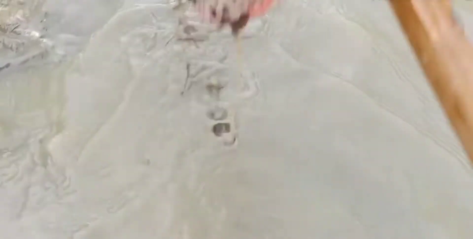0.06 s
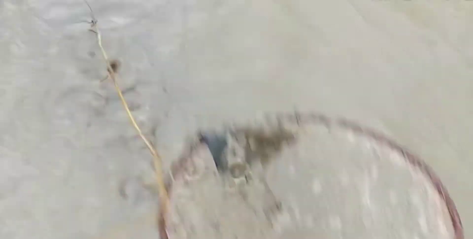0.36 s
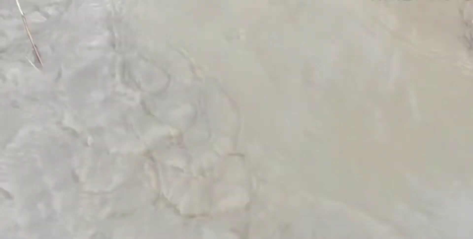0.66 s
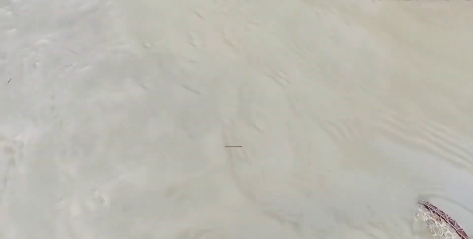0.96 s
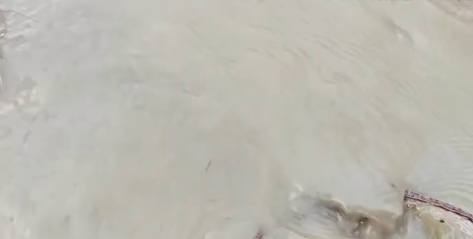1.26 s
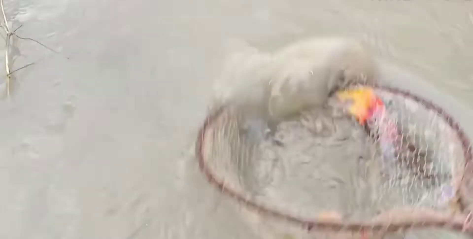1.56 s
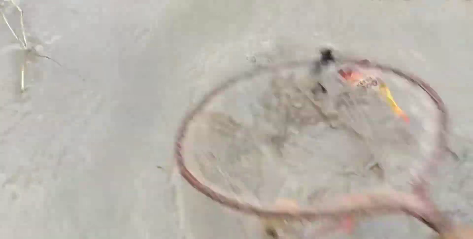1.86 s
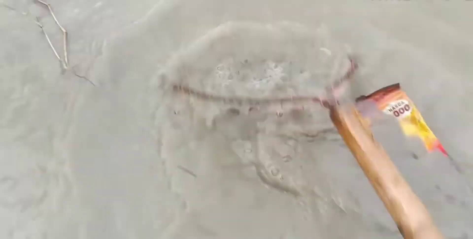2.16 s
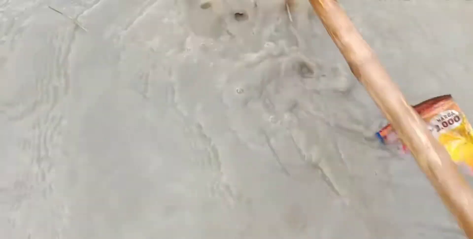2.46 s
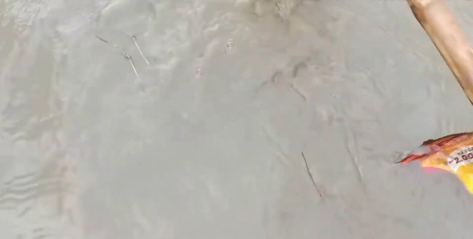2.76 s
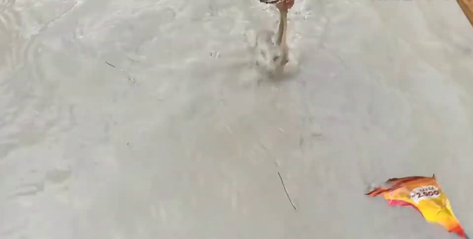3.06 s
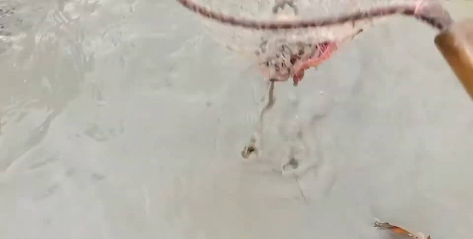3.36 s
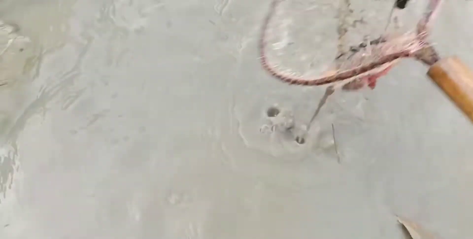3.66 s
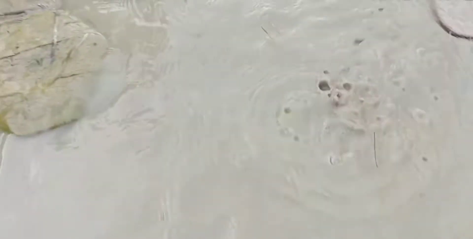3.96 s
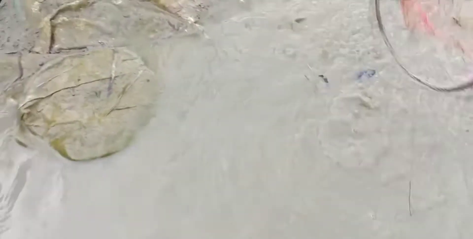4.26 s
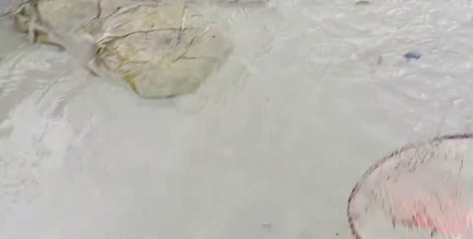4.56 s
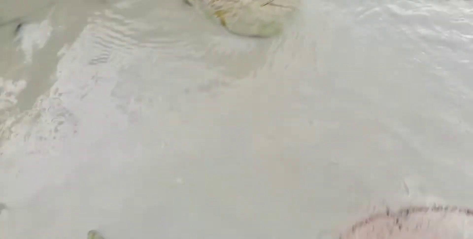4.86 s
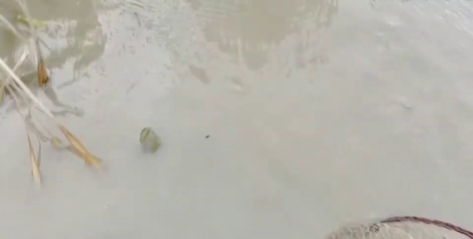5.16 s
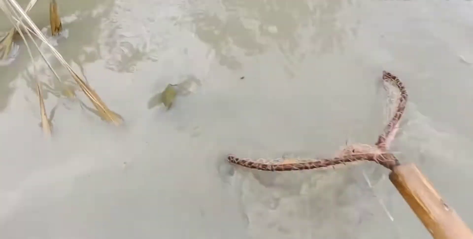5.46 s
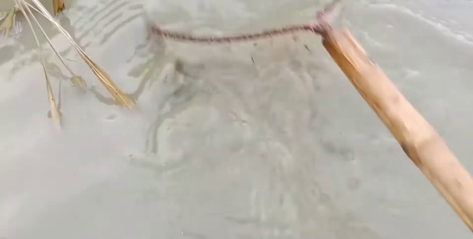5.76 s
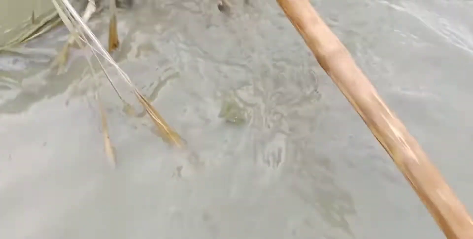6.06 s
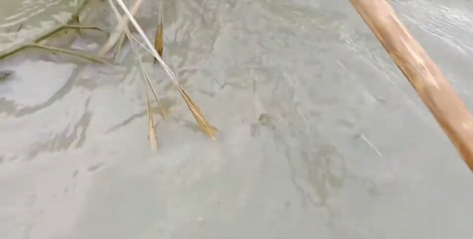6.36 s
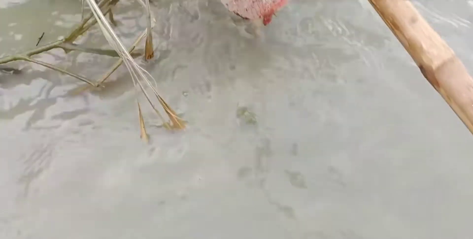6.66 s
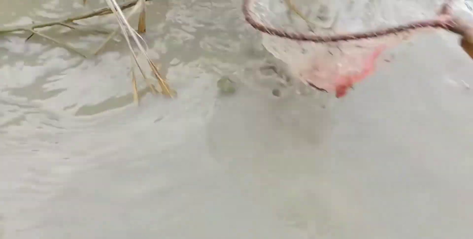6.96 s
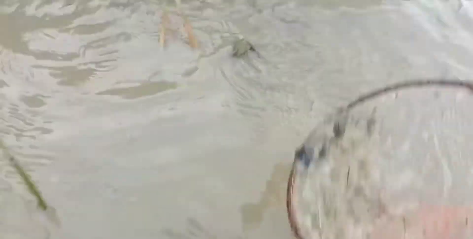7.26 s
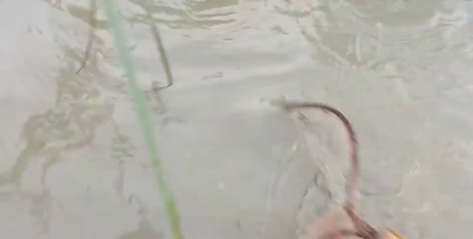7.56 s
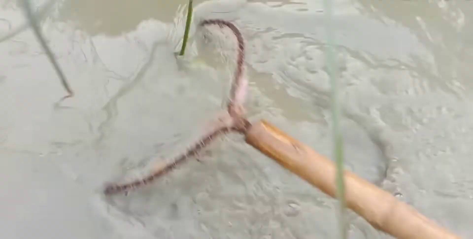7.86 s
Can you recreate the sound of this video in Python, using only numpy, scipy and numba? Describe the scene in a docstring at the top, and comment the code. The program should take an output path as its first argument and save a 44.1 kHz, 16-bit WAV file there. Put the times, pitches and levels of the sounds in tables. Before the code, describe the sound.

Close plops, gulps and fizzing splashes as a net scoops through a shallow stream, water trickling from the mesh after each stroke.

```python
"""A low outdoor rumble and a faint trickle, then close plops: a hand net on a bamboo pole is dipped,
swept and lifted through a shallow muddy stream. Trapped air rings as plops, gulps and slaps, falling
drops tick on the surface, and the mesh tears the water into fizzing splashes and trickles after each
stroke. Faint whistles, two knocks of the pole and a far hum sit behind the water.
The two microphone ports colour the treble differently."""
import sys
import numpy as np
from scipy import signal
from scipy.fft import rfft, irfft, next_fast_len
from scipy.io import wavfile
from scipy.ndimage import uniform_filter1d
from numba import njit

SR = 44100
rng = np.random.default_rng(int(sys.argv[2]) if len(sys.argv) > 2 else 0)


def dump_mix(stems):
    """Bounce the given channels to the path in sys.argv[1] as a 16-bit WAV at rate SR."""
    frames = np.atleast_2d(stems).T  # one column per channel
    limited = np.clip(frames, -1, 1)  # hard clip at full scale
    pcm = np.round(limited * 32767).astype(np.int16)
    wavfile.write(sys.argv[1], SR, pcm)


N = 348831
TIME = np.arange(N) / SR


def undb(db):
    """Decibels to gain."""
    return 10 ** (np.asarray(db) / 20)


def unit(x):
    """Scale to an rms of 1."""
    return x / np.sqrt(np.mean(x ** 2))


def band(x, low_hz, high_hz, order=2):
    """Causal band-pass."""
    edges_hz = [low_hz, min(high_hz, .45 * SR)]
    return signal.sosfilt(signal.butter(order, edges_hz, "band", fs=SR, output="sos"), x)


def colour(x, points):
    """Minimum-phase EQ through (pitch_hz, gain_db) points, so that attacks stay sharp."""
    size = 2 * next_fast_len(N // 2 + 4096)
    hz, db = np.transpose(points)
    bins_hz = np.arange(size // 2 + 1) * SR / size
    gain = undb(np.interp(np.log(bins_hz + 1), np.log(hz), db))
    cepstrum = irfft(np.log(gain))
    cepstrum[1:size // 2] *= 2
    cepstrum[size // 2 + 1:] = 0
    return irfft(rfft(x, size) * np.exp(rfft(cepstrum)))[..., :N]


def wander(rate_hz):
    """Smooth random modulation with an rms near 1."""
    hold = int(SR / rate_hz)
    steps = np.repeat(rng.standard_normal(N // hold + 1), hold)
    return unit(uniform_filter1d(steps, hold)[:N])


def add(out, start_s, x):
    """Mix a short sound into both ports."""
    start = max(int(start_s * SR), 0)
    out[:, start:start + x.shape[-1]] += x[..., :max(N - start, 0)]


def ring(hz, t60_s, rise=0, build_cycles=0.6):
    """A damped tone that builds over its first cycles and glides by the share `rise` as it dies."""
    t = TIME[:int(1.2 * t60_s * SR)]
    turns = hz * (t + rise * t ** 2 / (2 * t60_s))
    decay = np.exp(-np.log(1000) * t / t60_s)
    return np.sin(2 * np.pi * turns) * decay * (1 - np.exp(-turns / build_cycles))


def noise_tail(length, t60_s, low_hz, high_hz):
    """A dense decay of reflections, different at each port."""
    tail = rng.standard_normal((2, length)) * np.exp(-np.log(1000) * TIME[:length] / t60_s)
    return band(tail / np.linalg.norm(tail, axis=1, keepdims=True), low_hz, high_hz)


def reflected(x, t60_s, low_hz, wet_db):
    """Add close reflections, new for each spot on the water, keeping the sound's energy."""
    paths = undb(wet_db) * noise_tail(SR // 25, t60_s, low_hz, SR / 2)
    paths[:, 0] += 1  # the direct path
    heard = signal.fftconvolve(np.atleast_2d(x), paths, axes=1)
    dry_size = np.linalg.norm(x, axis=-1, keepdims=True)
    return heard * dry_size / np.linalg.norm(heard, axis=1, keepdims=True)


def outdoors(gain_db=3, side_db=-10, wide_db=-3, wide_hz=900):
    """Open air: a low rumble near the centre, under a faint wide hiss."""
    # tone of the air: pitch_hz, gain_db
    air = [(20, -11), (38, 1.5), (53, -5), (72, -3), (92, -8), (140, -8.5), (220, -15.5), (330, -22.5),
           (600, -27.5), (1500, -39), (4000, -54.5), (15000, -51.5)]
    # fader ride of the air: time_s, level_db
    rumble = [(0.0, -42), (1.12, -43.5), (4.07, -43), (5.08, -48.5), (6.2, -46.5), (6.4, -42), (7.9, -45.5)]
    mid, side = colour(rng.standard_normal((2, N)), air)
    side = undb(side_db) * side + undb(wide_db) * band(side, wide_hz, 15000)
    ride_db = np.interp(TIME, *np.transpose(rumble))
    return np.array([mid + side, mid - side]) / np.std(mid) * undb(ride_db + gain_db)


def hum(pitch_hz=71.1, drift=0.02494, waver_db=3):
    """A faint, far hum wanders in pitch and wavers in level, dead centre."""
    # partials of the hum: harmonic, level_db
    partials = [(1, -48.5), (2, -60)]
    phase = 2 * np.pi * np.cumsum(pitch_hz * (1 + drift * wander(3))) / SR
    return sum(undb(db) * unit(undb(waver_db * wander(5.5)) * np.sin(harmonic * phase))
               for harmonic, db in partials)


@njit
def tiny_bubbles(starts, hz, cycles, gains):
    """Each tiny bubble rings for its number of cycles, rising a little in pitch."""
    out = np.zeros(N)
    for k in range(len(starts)):
        length = int(cycles[k] * SR / hz[k])
        for i in range(min(length, N - starts[k])):
            age = i / length
            phase = 2 * np.pi * cycles[k] * age * (1 + .04 * age)
            out[starts[k] + i] += gains[k] * np.exp(-6 * age) * np.sin(phase)
    return out


def froth(per_s, low_hz, high_hz, cycles, scatter_db, lag_s=.00025):
    """A cloud of small bubbles, a few much louder than the rest; each reaches one port a little sooner."""
    # tone of the spray: pitch_hz, gain_db
    spray = [(400, 10), (1300, 5.5), (2200, 0.5), (3000, -5.5), (3900, -7.5), (6500, -9.5), (10000, -9.5),
             (15000, -6.5)]
    when, pitch, life, luck, place = rng.random((int(per_s * N / SR), 5)).T
    hz = (np.sqrt(low_hz) + pitch * (np.sqrt(high_hz) - np.sqrt(low_hz))) ** 2
    turns = cycles * (.5 + life) * np.sqrt(hz / low_hz)  # smaller bubbles ring for more cycles
    gains = np.sqrt(hz) * undb(-scatter_db * np.log(.01 + luck))
    lag = (place - .5) * lag_s * SR
    arrivals = [np.abs(when * N + side * lag).astype(np.int64) for side in (-1, 1)]
    cloud = np.array([tiny_bubbles(starts, hz, turns, gains) for starts in arrivals])
    return unit(colour(cloud, spray))


def mesh_flow(rise_s=0.1, drain_s=0.11, stream_db=-70.5):
    """The flow builds into each stroke, holds, then drains away to the stream's own trickle."""
    # strokes that set water running through the mesh: start_s, length_s, level_db
    strokes = [(0.178, 0.13, -56.5), (0.63, 0.23, -54), (1.698, 0.25, -54), (2.243, 0.053, -53),
               (2.76, 0.51, -53.5), (3.5, 0.96, -56), (3.976, 0.22, -55), (4.24, 0.17, -60),
               (5.442, 0.088, -59), (6.18, 0.4, -52.5), (6.69, 0.57, -58.5), (7.59, .3, -48)]
    flow = undb(stream_db)
    for start_s, length_s, db in strokes:
        outside = np.maximum((start_s - TIME) / rise_s, (TIME - start_s - length_s) / drain_s)
        flow = np.maximum(flow, undb(db) * np.exp(-np.maximum(outside, 0)))
    return flow


def trickle(spurt_db=3):
    """Water drains through the mesh in spurts: soft fizz, small gurgles, pitched drips, fine droplets."""
    flow = mesh_flow() * undb(spurt_db * wander(24))
    fizz = undb(-2) * froth(per_s=9000, low_hz=2200, high_hz=16000, cycles=18, scatter_db=2.8)
    gurgle = undb(-5) * froth(per_s=1800, low_hz=800, high_hz=3400, cycles=14, scatter_db=2)
    drips = undb(-7) * froth(per_s=45, low_hz=1350, high_hz=3200, cycles=32, scatter_db=2.2)
    droplets = undb(-6) * froth(per_s=90, low_hz=5200, high_hz=13000, cycles=24, scatter_db=3.2)
    return flow * (fizz + gurgle + drips + droplets)


def large_bubbles(wobble_db=2, gain_db=0.6, low_hz=450):
    """Trapped air rings for a set number of cycles, so low notes last longer."""
    # bubbles that stay under and nearly hold their pitch: start_s, pitch_hz, level_db
    plops = [(.178, 3340, -35.5), (.396, 1400, -22), (.567, 900, -27.5), (.568, 1562, -15.5),
             (.696, 1234, -16), (.7327, 1480, -26.5), (.822, 730, -32), (1.8215, 1830, -26.5),
             (2.226, 3070, -27), (2.812, 1814, -29), (2.921, 1510, -34.5), (3.058, 1810, -37.5),
             (3.314, 3080, -41), (3.5525, 1167, -21), (3.554, 677, -25.5), (3.7332, 598, -15),
             (3.752, 1450, -32), (3.765, 578, -17.5), (3.82, 2050, -34), (3.9608, 1386, -27.5),
             (4.201, 874, -14), (5.266, 970, -41.5), (5.449, 1480, -31.5), (6.259, 2350, -29.5),
             (6.7634, 756, -8), (6.855, 2310, -34), (7.1598, 1720, -17.5), (7.275, 2510, -32.5),
             (7.548, 1112, -27.5), (7.675, 507, -20.5), (7.716, 580, -14.5), (7.782, 519, -13.5),
             (7.843, 490, -21.5)]
    # bubbles that climb to the surface and swoop upward: start_s, pitch_hz, level_db
    gulps = [(.2812, 1120, -12.5), (1.677, 683, -25), (2.029, 1250, -25), (2.051, 1068, -14.5),
             (3.812, 627, -23), (4.097, 1110, -29.5), (4.184, 1060, -20), (6.124, 623, -28),
             (6.162, 875, -30.5), (6.826, 1082, -25), (7.641, 642, -20.5), (7.665, 1554, -26),
             (7.684, 750, -13), (7.697, 1006, -11.5), (7.842, 693, -18.5)]
    # open pockets of air that close at once: start_s, pitch_hz, level_db
    slaps = [(.2645, 1350, -21), (.5955, 2120, -17), (1.679, 1020, -16), (1.7885, 1930, -7),
             (1.8975, 1510, -17.5), (2.0535, 1960, -3), (2.0592, 590, -8), (3.4437, 4520, -4.5),
             (3.4692, 1066, -6.5), (3.487, 1830, -14.5), (3.5523, 1640, -7.5), (4.217, 1150, -9.5),
             (6.7634, 1450, -12.5), (7.156, 2470, -16), (7.579, 2020, -13), (7.81, 1430, -12.5),
             (7.842, 2000, -33)]
    out = np.zeros((2, N))
    for rows, cycles, rise, pinch_s in ((plops, 64, .061, .0013),
                                        (gulps, 54, .614, .0008),
                                        (slaps, 16.7, -.16, .00065)):
        for start_s, hz, db in rows:
            bubble = ring(hz, cycles / hz, rise, build_cycles=hz * pinch_s)
            add(out, start_s, undb(db) * reflected(bubble, t60_s=.056, low_hz=760, wet_db=-2))
    wobble = undb(gain_db + wobble_db * wander(230))  # loudness wobbles as the bubbles' shape does
    return band(out * wobble, low_hz, 18000, order=4)  # little lies below the largest bubble's pitch


def drop_ticks(touch_s=.001, crack_s=.0007, spatter_s=.03, spatter_db=-20, gain_db=-8, beads=3):
    """Each drop cracks the surface, throws fine spatter and leaves a few tiny ringing beads of air."""
    # drops striking the surface: hit_s, level_db
    drops = [(.266, -29), (.345, -30.5), (.568, -28.5), (.673, -27.5), (0.696, -23), (.733, -19),
             (0.851, -17.5), (1.713, -25.5), (1.794, -15), (2.0589, -7), (2.258, -27), (2.282, -35),
             (2.794, -20.5), (2.922, -23.5), (3.022, -27), (3.263, -23.5), (3.339, -24.5), (3.4447, -14.5),
             (3.555, -19), (3.898, -19), (3.962, -26.5), (4.216, -13), (5.576, -25.5), (6.079, -24.5),
             (6.764, -8.5), (6.78, -21), (6.819, -20.5), (7.156, -22.5), (7.579, -12.5), (7.842, -15.5)]
    out = np.zeros((2, N))
    age = TIME[:SR // 20] - 10 * touch_s
    crack = np.exp(np.minimum(age / touch_s, -age / crack_s))
    spatter = np.exp(np.minimum(age / touch_s, -age / spatter_s))
    envelope = crack + undb(spatter_db) * spatter
    for hit_s, db in drops:
        gain = undb(db + gain_db)
        burst = envelope * rng.standard_normal((2, len(age)))
        add(out, hit_s + age[0], gain * burst * np.std(envelope) / np.std(burst))
        for hz in 4000 + 8000 * (np.arange(beads) + rng.random(beads)) / beads:
            bead = reflected(ring(hz, t60_s=.007, build_cycles=2), t60_s=.018, low_hz=2000, wet_db=-2)
            add(out, hit_s, gain * rng.uniform(.44, 1) * bead)
    return band(out, 4000, 14000)


def splashes(gain_db=-1, surge_db=2.5, splash_top_hz=14000):
    """The net tears the water: dense froth swells and collapses, deeper when more air is dragged under."""
    # sheets of water breaking: crest_s, level_db, swell_s, fade_s, low_hz
    sheets = [(0.794, -38, 0.0043, 0.036, 1820), (.848, -34.5, 0.042, .009, 550),
              (1.1, -49.5, 0.031, .028, 2180), (1.701, -42, 0.033, 0.044, 646),
              (1.791, -20, .0092, 0.0044, 1720), (1.993, -30.5, .022, 0.028, 1460),
              (2.052, -17, 0.0087, 0.014, 520), (2.248, -29.5, 0.018, .036, 2000),
              (2.586, -32.5, 0.041, 0.03, 700), (3.466, -31.5, .0074, 0.023, 735),
              (3.555, -25.5, 0.0062, 0.0061, 910), (3.872, -35, 0.04, .013, 5240),
              (4.013, -40, 0.019, 0.02, 3170), (4.188, -21.5, 0.02, 0.03, 975),
              (5.5, -37.5, .023, 0.019, 1800), (5.802, -49, 0.034, .029, 990),
              (7.136, -35.5, 0.0068, .019, 3530)]
    # the hoop churning under water: crest_s, level_db, high_hz
    churns = [(4.195, -39, 2630), (6.19, -38, 3240), (7.681, -28.5, 1680), (7.83, -34.5, 1920)]
    churn_shape = (.048, .035, 490)  # swell_s, fade_s, low_hz
    bursts = [(*row, splash_top_hz) for row in sheets]
    bursts += [(crest_s, db, *churn_shape, high_hz) for crest_s, db, high_hz in churns]
    foam = froth(per_s=5000, low_hz=400, high_hz=16000, cycles=19, scatter_db=2.9)
    foam *= undb(surge_db * wander(200))  # the mesh tears the water in quick surges
    out = np.zeros((2, N))
    for crest_s, db, swell_s, fade_s, low_hz, high_hz in bursts:
        start = max(int((crest_s - 4 * swell_s) * SR), 0)
        end = int((crest_s + 6 * fade_s) * SR)
        age = TIME[start:end] - crest_s
        envelope = np.exp(-np.maximum(-age / swell_s, age / fade_s) ** 1.16)
        burst = envelope * band(foam[:, start:end], low_hz, high_hz, order=3)
        gain = undb(db + gain_db) * np.std(envelope) / np.std(burst)
        add(out, start / SR, gain * reflected(burst, t60_s=.025, low_hz=1497, wet_db=-5))
    return out


def whistles(flutter_db=2):
    """Faint, thin whistles arch up and down in pitch, fluttering in level."""
    # whistled notes: start_s, length_s, pitch_hz, bend_hz, level_db
    notes = [(2.335, 0.036, 9150, 700, -47), (5.371, 0.31, 1660, 168.5, -58),
             (7.396, 0.13, 9470, 292, -46.5), (7.453, 0.12, 9540, 900, -48.5)]
    out = np.zeros((2, N))
    for start_s, length_s, hz, bend_hz, db in notes:
        arch = np.sin(np.linspace(0, np.pi, int(length_s * SR)))
        phase = 2 * np.pi * np.cumsum(hz + bend_hz * arch) / SR
        add(out, start_s, undb(db) * arch * np.sin(phase))
    return out * undb(flutter_db * (wander(380) + .5))


def pole_knocks():
    """The wet pole bumps and rings briefly."""
    # dull knocks: start_s, level_db
    knocks = [(4.3, -34), (4.3897, -21)]
    # resonances of the pole: pitch_hz, level_db, t60_s
    modes = [(640, 6.5, 0.016), (1100, -1.5, 0.02), (1380, -28, .012)]
    out = np.zeros((2, N))
    for start_s, db in knocks:
        for hz, mode_db, t60_s in modes:
            add(out, start_s, undb(db + mode_db) * ring(hz, t60_s))
    return out


def bank_echo(x, wet_db=-19):
    """The banks return a faint, short wash."""
    tail = noise_tail(SR // 3, t60_s=.13, low_hz=500, high_hz=9000)
    return undb(wet_db) * signal.fftconvolve(x, tail, axes=1)[:, :N]


def scene():
    """The water close by, its echo off the banks, the open air and a far hum."""
    close = large_bubbles() + drop_ticks() + splashes() + trickle() + pole_knocks() + whistles()
    return close + bank_echo(close) + outdoors() + hum()


def record(dry, top_hz=15800):
    """Each microphone port has its own treble peaks and notch; the top is cut off steeply."""
    # EQ of the two ports: pitch_hz, left_db, right_db
    ports = [(885, -2.5, -1.5), (2970, 7.5, 9), (5240, 2.5, 10), (5400, 8, 9.5), (6920, -18, 14),
             (7480, -3, 7), (8950, 7, -3.5), (9630, 13, -15), (11160, 3.5, -39), (11640, 2, 1),
             (14400, -1.5, 3.5)]
    hz, left_db, right_db = np.transpose(ports)
    left = colour(dry[0], np.column_stack([hz, left_db]))
    right = colour(dry[1], np.column_stack([hz, right_db]))
    high_cut = signal.ellip(10, .2, 80, top_hz, fs=SR, output="sos")
    return signal.sosfilt(high_cut, np.array([left, right]))


dry = scene()
out = record(dry)
dump_mix(out)
```